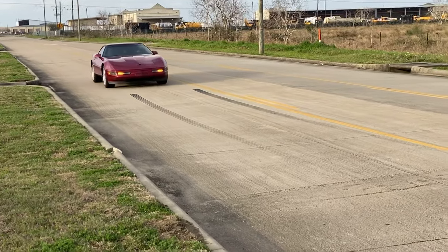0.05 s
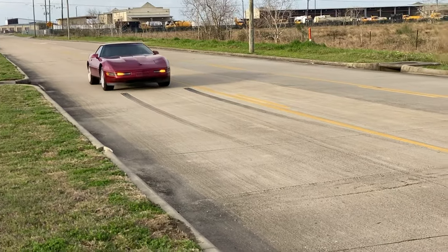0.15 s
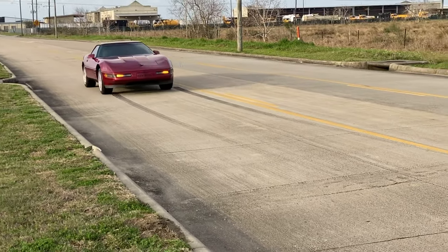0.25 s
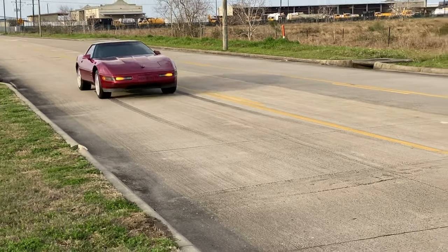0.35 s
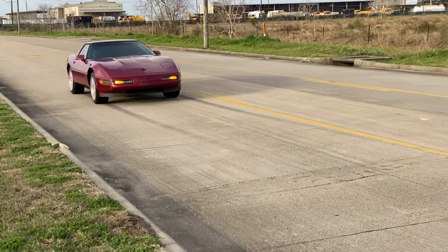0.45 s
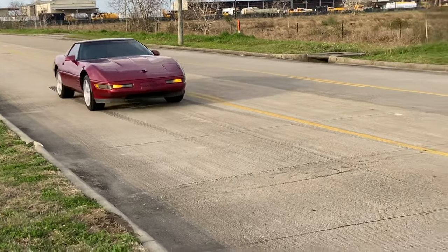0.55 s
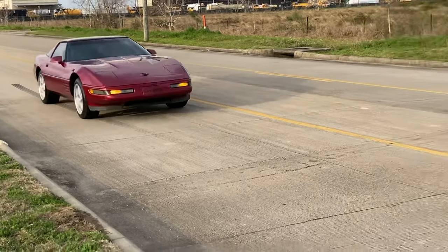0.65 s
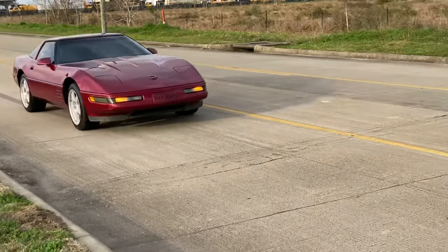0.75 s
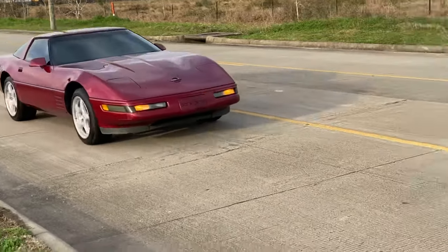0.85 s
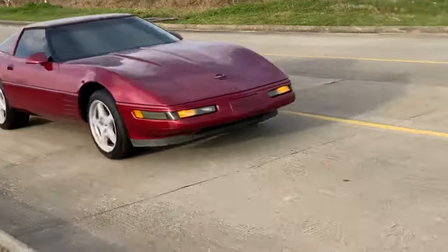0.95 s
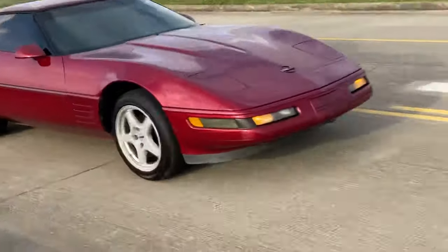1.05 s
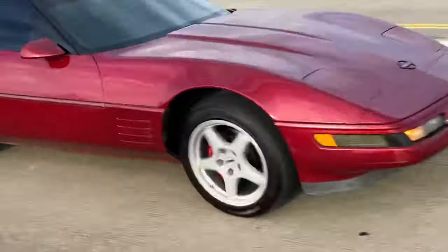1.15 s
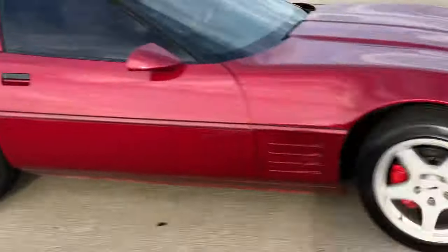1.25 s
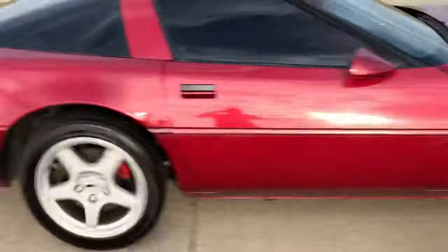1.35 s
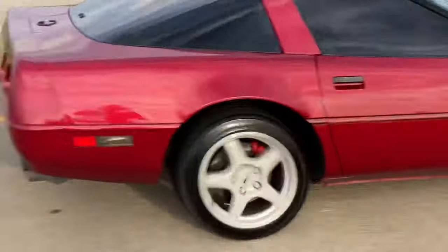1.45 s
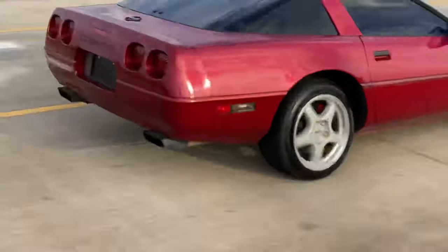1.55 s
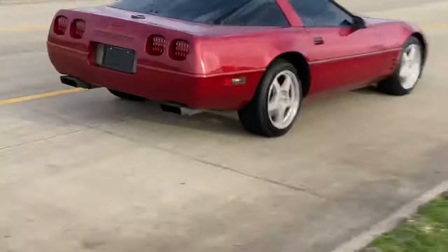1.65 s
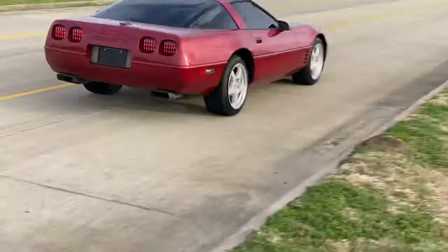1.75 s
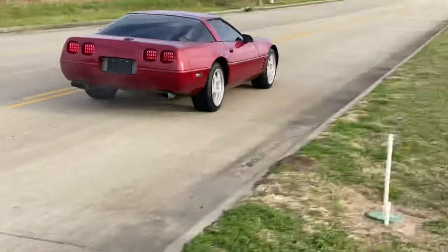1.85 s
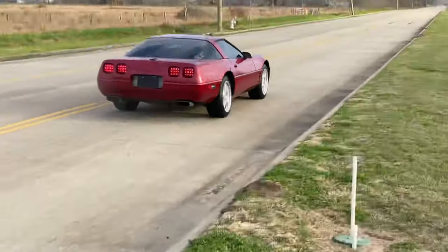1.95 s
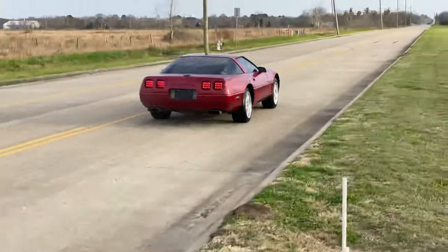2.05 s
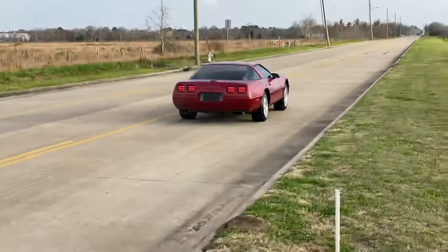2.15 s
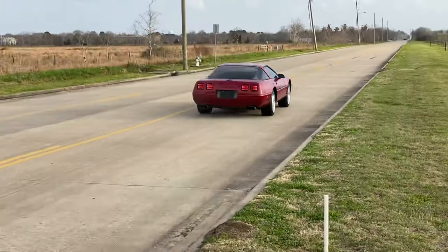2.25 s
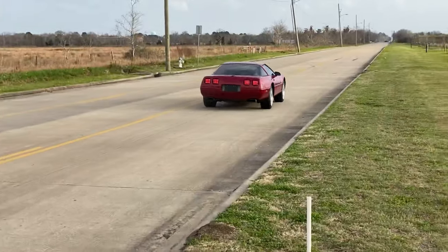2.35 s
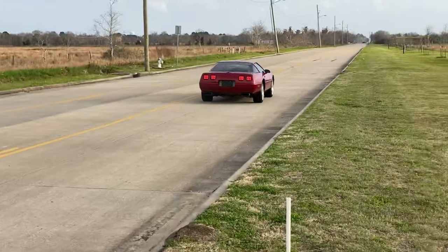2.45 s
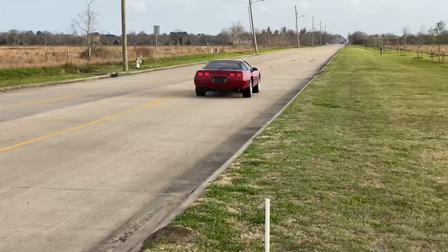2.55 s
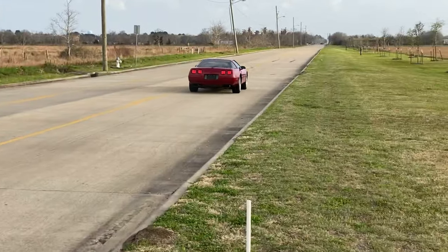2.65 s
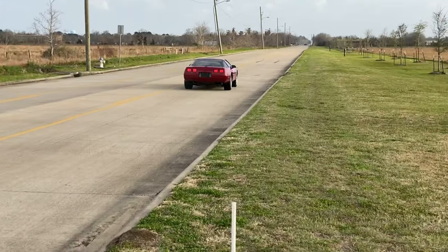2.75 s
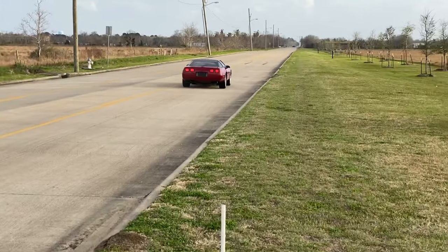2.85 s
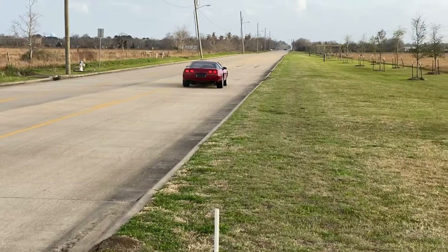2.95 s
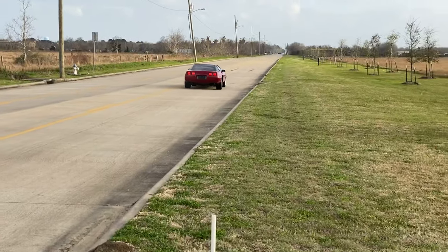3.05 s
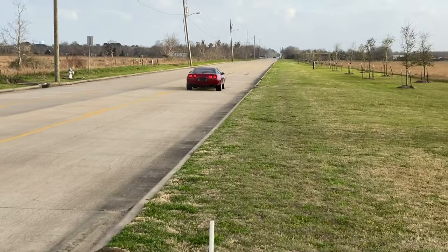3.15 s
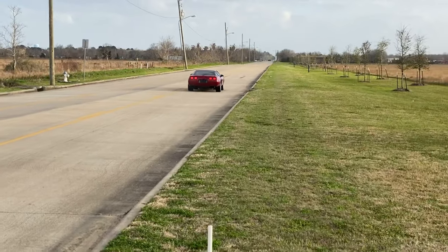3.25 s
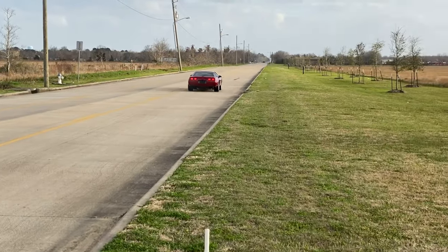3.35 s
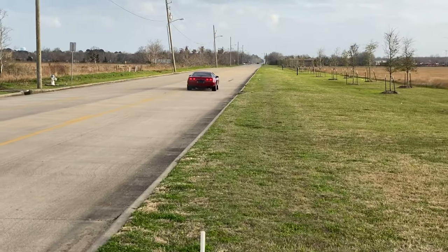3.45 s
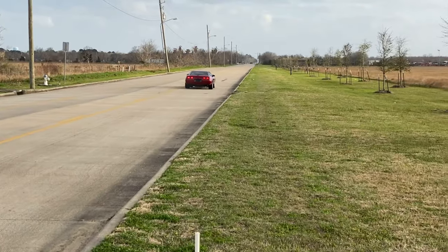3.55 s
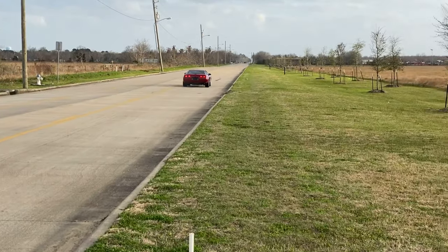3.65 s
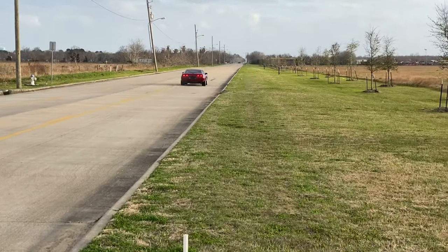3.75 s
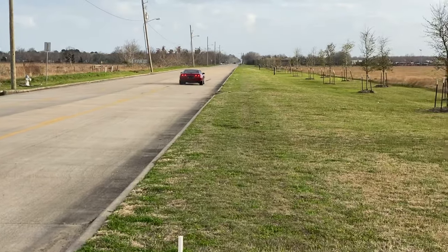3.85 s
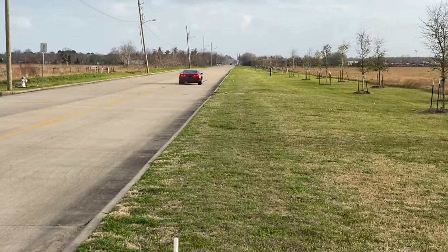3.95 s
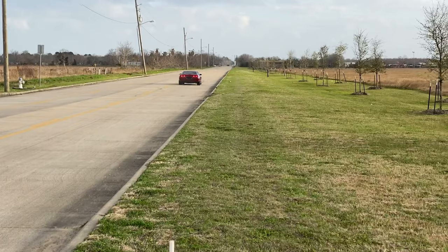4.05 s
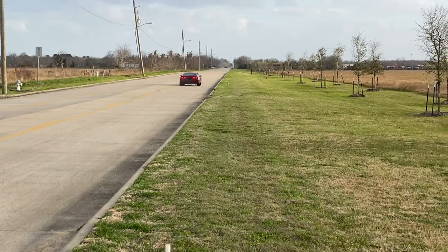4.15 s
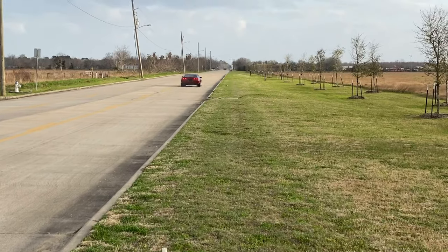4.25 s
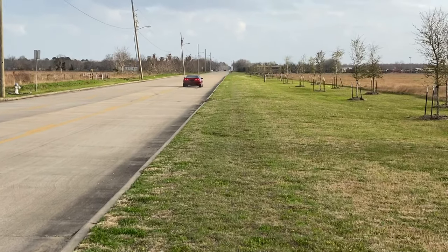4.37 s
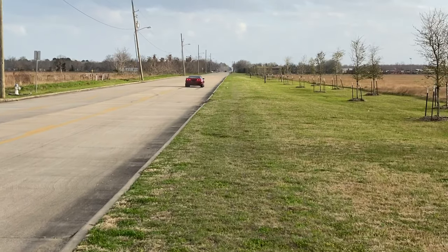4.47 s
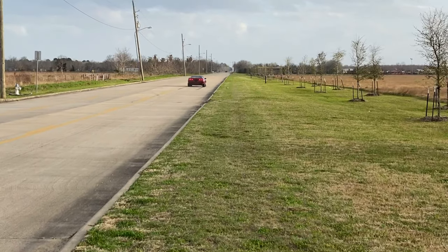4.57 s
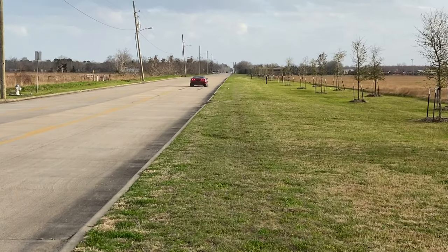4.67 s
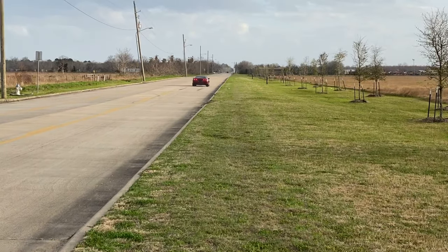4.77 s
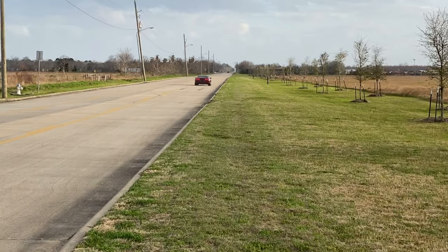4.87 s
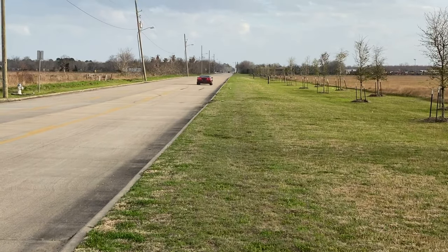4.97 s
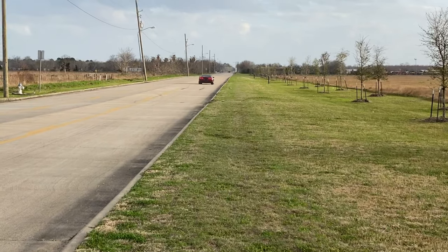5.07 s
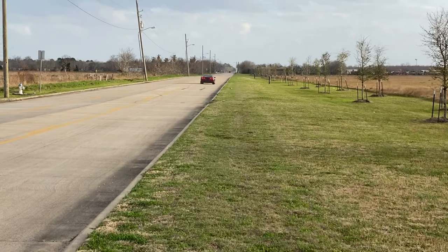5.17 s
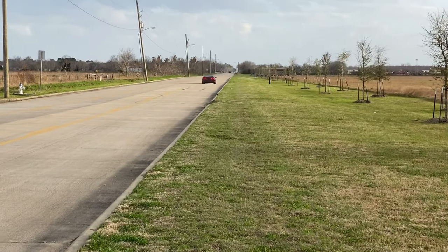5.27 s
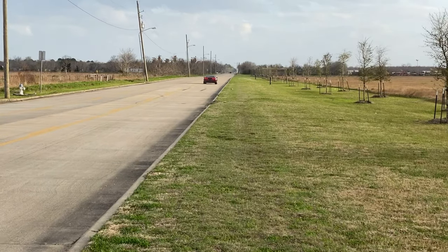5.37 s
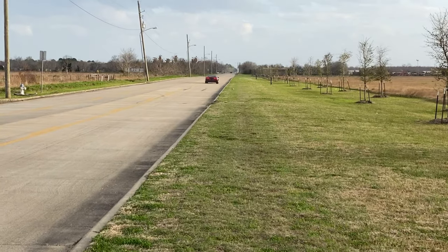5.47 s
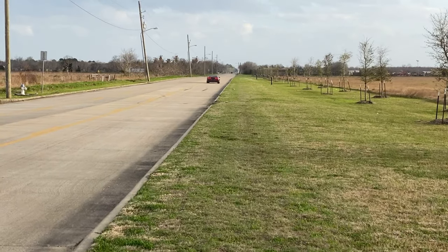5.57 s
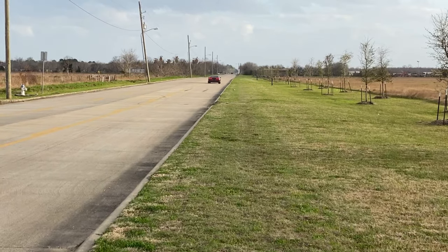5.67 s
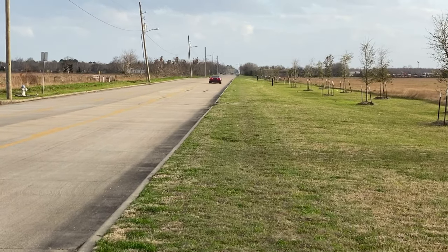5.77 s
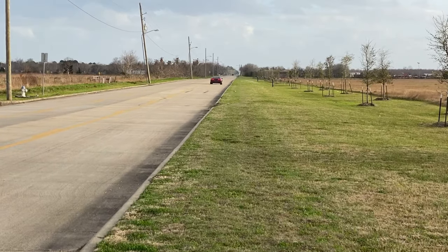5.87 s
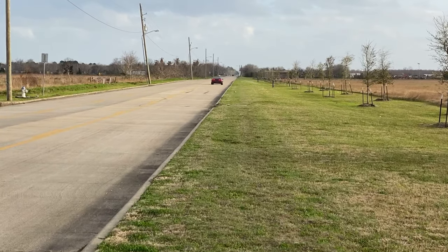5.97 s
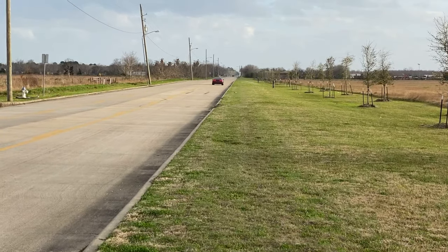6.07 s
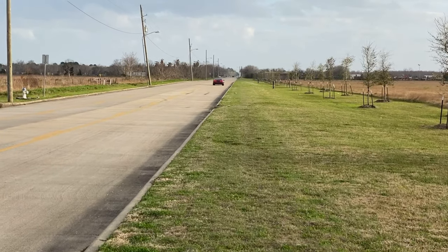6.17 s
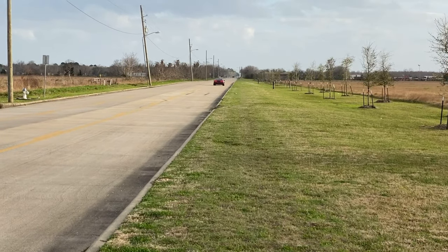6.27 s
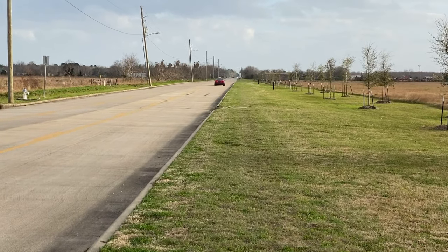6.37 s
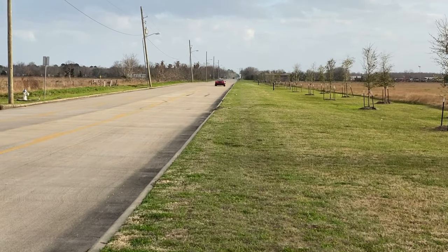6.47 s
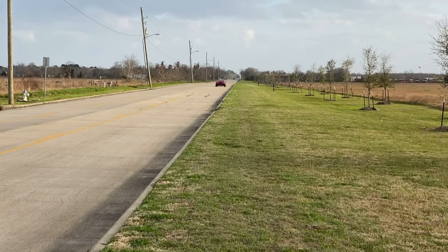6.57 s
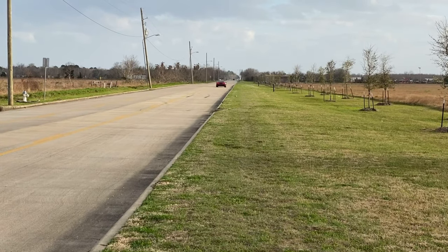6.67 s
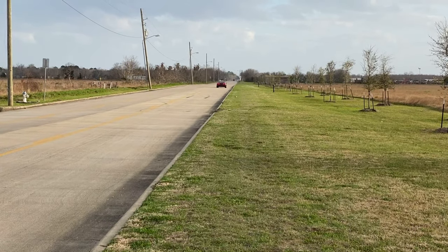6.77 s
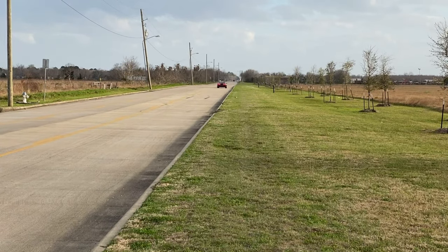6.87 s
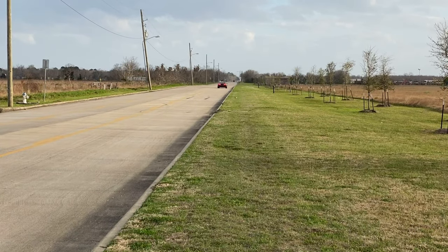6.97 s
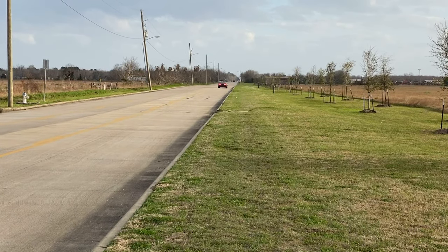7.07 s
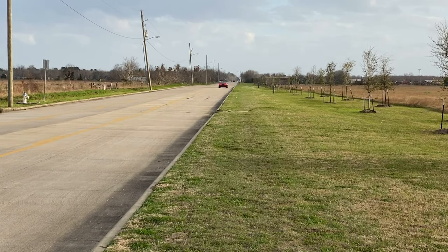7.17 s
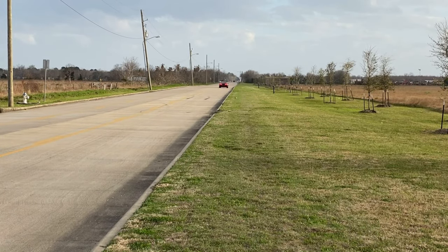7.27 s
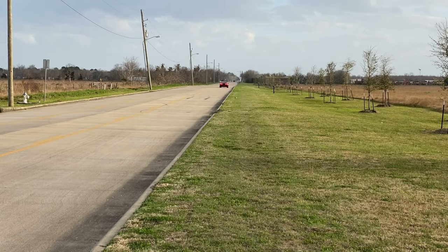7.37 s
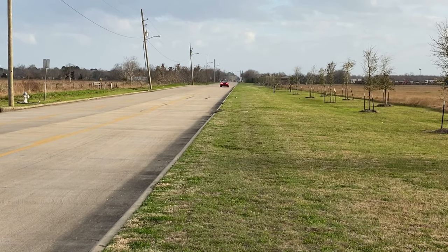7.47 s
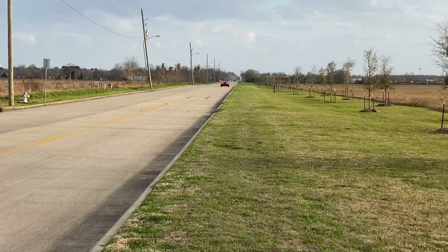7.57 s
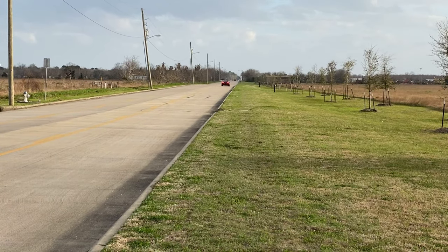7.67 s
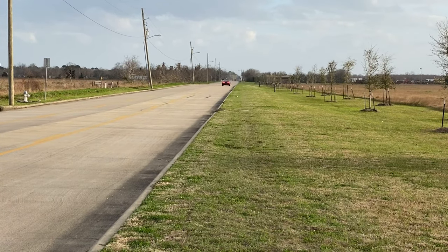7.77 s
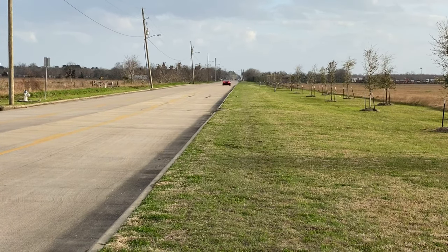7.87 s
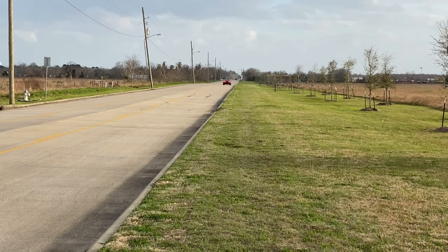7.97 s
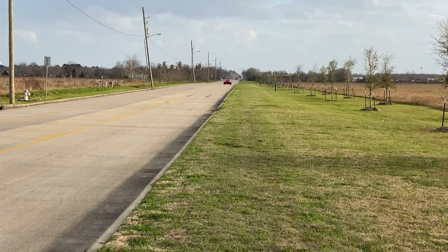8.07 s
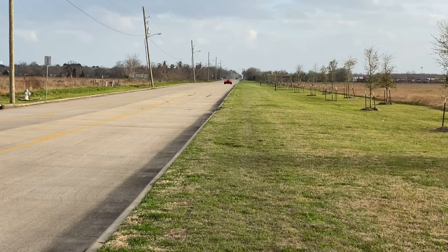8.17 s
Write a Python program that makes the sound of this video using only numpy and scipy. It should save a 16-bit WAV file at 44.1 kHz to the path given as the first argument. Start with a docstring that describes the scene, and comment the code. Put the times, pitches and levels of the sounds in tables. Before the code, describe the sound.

Close handheld roadside stereo microphone in an open field: an uneven, booming V8 climbs in pitch and sweeps past within about a second. Harsh bark and sizzle burst from the tailpipes, air buffets the microphone, and a quick blip follows. The car recedes under power, changes up with a crackle, then burbles lower with scattered sharp pops, dry and without obvious reverberation.

```python
"""A V8 car with open exhausts accelerates past a roadside listener, lifts off, blips and pulls away down an empty road.
Then it shifts up and coasts far off, burbling and popping on the overrun.
All along, eight uneven firings a cycle make the exhaust: a boom of low tones, and bark, rasp and sizzle above it.
Shaped noise makes the tyres, the open field and a light breeze from the start, then the car's wake as it passes.
Gas thumps follow the pass, and the pops are sharp cracks with low thuds."""
import sys
import numpy as np
from scipy import signal
from scipy.fft import rfft, irfft
from scipy.io import wavfile
from scipy.ndimage import uniform_filter1d, map_coordinates

SR = 44100
rng = np.random.default_rng(int(sys.argv[2]) if len(sys.argv) > 2 else 0)


def generate_wav(sig):
    """Save sig (samples, or channels by samples) to the path in sys.argv[1] as 16-bit PCM at SR."""
    pcm = np.round(np.clip(np.atleast_2d(sig).T, -1, 1) * 32767).astype(np.int16)
    wavfile.write(sys.argv[1], SR, pcm)


N = 362485
TIME = np.arange(N) / SR  # seconds
BINS = np.fft.rfftfreq(2 ** 19, 1 / SR)  # Hz


def gain_of(db):
    """Turns decibels into a gain."""
    return 10 ** (np.asarray(db) / 20)


def evened(x):
    """Scales a sound to rms 1."""
    return x / np.sqrt(np.mean(x ** 2) + 1e-20)


def steadied(x, size=4400):
    """Holds the running rms near 1 while keeping the single firings."""
    power = uniform_filter1d(uniform_filter1d(x ** 2, size), size // 2)
    return x / np.sqrt(abs(power) + 1e-20)


def curves(rows):
    """Draws the columns of a table as curves over time."""
    s, *columns = np.transpose(rows)
    return [np.interp(TIME, s, column) for column in columns]


def read(points):
    """Reads a table of values by pitch at every frequency bin."""
    hz, value = np.transpose(points)
    return np.interp(np.log(BINS + 1), np.log(hz + 1), value)


def filtered(x, response):
    """Makes each frequency louder, softer or shifted in phase."""
    size = 2 * (len(BINS) - 1)
    return irfft(rfft(x, size) * response)[..., :N]


def causal(points, order=4096):
    """The ring after a sharp blow, with this spectrum and energy 1."""
    spectrum = gain_of(read(points)[::(len(BINS) - 1) // order])
    cepstrum = irfft(np.log(spectrum))
    one_sided = np.r_[0, 2 * cepstrum[1:order]]  # puts the energy as early as it can be
    ring = irfft(np.exp(rfft(one_sided, 2 * order)))[:order]
    return ring / np.linalg.norm(ring)


def coloured(x, points):
    """Passes a sound through a spectrum table."""
    return signal.oaconvolve(x, causal(points))[:N]


def noise(points):
    """Steady noise of rms 1 with this spectrum."""
    return evened(coloured(rng.standard_normal(N), points))


def wander(hz):
    """A slow random curve of rms 1 that changes about hz times a second."""
    return evened(filtered(rng.standard_normal(N), np.exp(-(BINS / hz) ** 2)))


def above(hz, order=8):
    """The upper side of a crossover filter."""
    return 1 - 1 / (1 + (BINS / hz) ** order)


def bump(s, width_s):
    """A smooth swell of height 1 around a moment."""
    return np.exp(-((TIME - s) / width_s) ** 2)


def resonate(x, hz, width_hz):
    """A resonance of gain 1 that follows the curve hz."""
    turn = np.exp(2j * np.pi * np.cumsum(hz) / SR)
    r = np.exp(-np.pi * width_hz / SR)
    # shift the peak down to 0 Hz, smooth, and shift it back
    return 2 * (turn * signal.lfilter([1 - r], [1, -r], x / turn)).real


PASS_S = 1.262  # when the car is nearest


def nearness(nearest_m=2.52, car_m_per_s=7.87):
    """The car's closest distance over its present distance, on a straight path."""
    return nearest_m / np.hypot(nearest_m, car_m_per_s * (TIME - PASS_S))


def receding():
    """Loudness that holds until the car has passed, then falls with distance."""
    return np.where(TIME < PASS_S, 1, nearness())


# Strength of the eight firings: one level/dB for each cylinder.
UNDER_LOAD = [-11, -1.5, -11, -7, -12.5, -1, -12.5, -4.5]
BESIDE = [-7, -4, 1.5, -10.5, 1.5, 2, -11.5, 2.5]  # beside the listener
NEXT_GEAR = [-1.5, -6, 0, -2, -1, -13, 1.5, -6]
OVERRUN = [-8, 1.5, -3.5, 3, -15, -8, 4, -8]
FAR_OFF = [-12.5, -8, -2, 0.5, -9.5, -26, -3.5, 0.5]
# Low tones of the pipes: level/dB of 2, 3, 4, ... times the cycle rate.
LAUNCH_ORDERS = [-9, 3.5, 3, 2.5, -3.5, -6, 1, -2, -2, -2, 0, 2, -0.5, -13]
NEARING_ORDERS = [-15.5, 1, -4, -8.5, -6, -7, -2.5, 0, -5.5, -14, -10, -10]
PASSING_ORDERS = [-27, 2, -13, -4, 0, -10, 0.5, -0.5, -7.5, -8, -24]
SURGE_ORDERS = [-11, 0, -18, -2, -11, -8, 1, -4, -5, -23]
EASING_ORDERS = [-10, -0.5, -16, 3, -21, -1.5, 0, -1, -7, -2]
BLIP_ORDERS = [-20, -6.5, -7, -3.5, -10, -6, -1, 2.5, -8, -5, -11, -22, -11.5, -22]
SETTLING_ORDERS = [-28, -10, -5, -7, -7, -5.5, 1.5, 0, -4, -9, -9, 3.5, -2.5, -18, -11, -6.5, -17, -9, -10,
                   -6.5]
LEAVING_ORDERS = [-23, -18, -7, -20, -6.5, -9, 2, -11, -2, -10, -1, -4, 2, -26, -10, -11, -8, -15, -25, -11,
                  -10.5, -16, -20, -11, -24, -17, -15, -9, -24, -10]
PULLING_ORDERS = [-27, -19, 0, -8.5, -6.5, -8.5, 0.5, -6, 0.5, 1, 0, -10.5, -6.5, -17, -8, -3.5, -13.5, -17,
                  -15, -13, -14.5, -18, -12.5, -18, -19, -28]
SHIFTING_ORDERS = [-17, -34, -15, -10.5, -6, -5, 3, -23, -9.5, -3.5, -24, -8, -5, -8, -3, -10, -17, -12,
                   -14, -12, -19, -8, -12, -22, -28, -25, -18]
COASTING_ORDERS = [-20, -11, -15.5, -6.5, -1, -4, 2, 1, -8, -1, -4, 0, 2, 0, 4.5, -8, -18.5, -14, -16, -6.5,
                   -12, -7]
FAR_ORDERS = [-20, -11.5, -10.5, -14, -2, -12, 1.5, -27, -16, -19, -11.5, -19, -17, -5.5, -2, -13, -9.5,
              -18, -12.5, -22, -19, -11.5, -8.5]
# Colour of the exhaust above the boom: f/Hz, level/dB.
LAUNCH_COLOUR = [(290, -46), (500, 3.5), (658, -14.5), (988, -9), (1250, -19.5), (1640, -15.5),
                 (2680, -17.5), (7290, -22), (11900, -42), (14400, -35), (16000, -43)]
NEARING_COLOUR = [(290, -18), (500, 1), (708, -2.5), (1080, -6), (1400, -23.5), (1560, -19), (1680, -7.5),
                  (1800, -15), (1980, -20.5), (2300, -17), (3590, -23.5), (6880, -18), (10500, -30.5),
                  (14400, -31), (16000, -24)]
PASSING_COLOUR = [(290, -41), (500, 3), (974, -11), (1340, -5.5), (1560, -13), (1800, -1.5), (2350, -7.5),
                  (3050, -1), (3800, -7), (4500, -8.5), (5400, -12.5), (6600, -9), (12100, -23.5),
                  (14400, -15.5), (16000, -28)]
LEAVING_COLOUR = [(290, -39), (500, -17), (560, -10.5), (1060, -19), (1300, -18), (1570, -28.5),
                  (1740, -24), (3100, -23.5), (7510, -28.5), (8680, -36), (14200, -39), (16000, -36)]
PULLING_COLOUR = [(290, -41), (500, -9.5), (960, -11), (1300, -13.5), (1650, -17), (2030, -15),
                  (2450, -17.5), (3100, -14.5), (6500, -24.5), (9890, -35.5), (16000, -45)]
SHIFTING_COLOUR = [(290, -36), (500, 9.5), (700, -1), (1050, -5.5), (1300, -10), (1650, -9), (2200, -6.5),
                   (2550, -11.5), (2950, -7.5), (4000, -18.5), (6500, -25), (9890, -41.5), (16000, -51)]
COASTING_COLOUR = [(350, -30), (520, 9.5), (680, 10), (1000, -0.5), (1250, -3), (1600, -8), (1850, -4),
                   (2200, -1.5), (2500, -9.5), (3000, -1.5), (4000, -10), (5500, -13.5), (8000, -25.5),
                   (16000, -66)]
FAR_COLOUR = [(350, -5), (560, 2), (680, 14), (830, 3), (980, 2), (1120, 1), (1250, -8), (1380, -11.5),
              (1600, -16.5), (2200, -17), (3000, -16), (4500, -18.5), (7000, -30), (16000, -58)]
# Phases of the drive: start t/s, end t/s, orders, colour, firing strengths,
# sweep of each firing/turns (falling if positive), boom level/dB, bark level/dB, sizzle level/dB
# (all close by, at effort 0), roughness/0-1, unevenness/factor on the cylinder dB, smear of the puffs/0-1.
PHASES = [ (0, 0.24, LAUNCH_ORDERS, LAUNCH_COLOUR, UNDER_LOAD, -1.2, -13.5, -22, -38, 0.29, 0.5, 0.33),
          (0.586, 1.202, NEARING_ORDERS, NEARING_COLOUR, BESIDE, -1.17, -11, -22.5, -33, 0.16, 0.15, 0.32),
          (1.25, 1.319, SURGE_ORDERS, NEARING_COLOUR, BESIDE, -.5, -11.5, -28.5, -25.5, 0.1, 0.28, 0.32),
          (1.356, 1.562, PASSING_ORDERS, PASSING_COLOUR, BESIDE, 0.62, -12, -19.5, -21.5, 0.07, 0.67, .02),
          (1.647, 1.68, EASING_ORDERS, PASSING_COLOUR, BESIDE, 0.62, -13, -22, -23.5, 0.12, 0.94, .02),
          (1.73, 1.872, BLIP_ORDERS, PASSING_COLOUR, UNDER_LOAD, 1.1, -10.5, -21.5, -22, 0.15, 0.72, .02),
          (1.965, 2.19, SETTLING_ORDERS, LEAVING_COLOUR, UNDER_LOAD, 1.6, -11, -22, -27.5, 0.11, 0.83, 0.045),
          (2.287, 2.717, LEAVING_ORDERS, LEAVING_COLOUR, UNDER_LOAD, 1.6, -11, -19, -27.5, 0.13, 0.99, 0.053),
          (3.056, 4.29, PULLING_ORDERS, PULLING_COLOUR, UNDER_LOAD, 1.573, -10.5, -22.5, -28, 0.18, 0.73, .16),
          (4.488, 4.926, SHIFTING_ORDERS, SHIFTING_COLOUR, NEXT_GEAR, 1.22, -12.5, -18, -30, 0.09, 0.98, .06),
          (5.003, 6.543, COASTING_ORDERS, COASTING_COLOUR, OVERRUN, .8, -14, -20.5, -33, 0.23, 0.81, 0.12),
          (6.81, 8.22, FAR_ORDERS, FAR_COLOUR, FAR_OFF, .4, -11, -17.5, -36, 0.085, 0.9, 0.42)]


def phase_shares():
    """How much each phase counts at each moment, fading from one to the next."""
    edges = [s for row in PHASES for s in row[:2]]
    return [np.interp(TIME, edges, np.repeat(one, 2)) for one in np.eye(len(PHASES))]


# How hard the exhaust is driven: t/s, effort level/dB.
EFFORT = [(0, 1), (.23, 3.5), (.35, -3), (0.799, 0.5), (1.15, -6), (1.65, -2.5), (1.85, 1), (2.05, -0.5),
          (2.65, -4.5), (4.38, -4), (4.445, 0.5), (4.485, -4), (4.51, 7.5), (4.92, 4.5), (5.0, -4),
          (5.08, -15), (5.3, -5), (5.85, -9.5), (5.96, 1.5), (6.58, 1), (6.721, -3), (8.22, 5)]
# Change for each dB of effort, in order boom, bark, rasp, sizzle: level/dB per dB.
FOLLOWS_EFFORT = (.15, .5, 1.01, 1.1)
# Gear changes, each a cut in power, a ragged surge and a second cut:
# surge t/s, surge level/dB, cut level/dB, added roughness/0-1.
GEAR_CHANGES = [(1.278, 2, -5.5, 0.2), (4.42, 0, -6, 0.39)]


def drive(rasp_db=-22, cut_offset_s=0.053, cut_width_s=0.0084, surge_width_s=0.041, rough_width_s=0.082):
    """Band levels and firing manner, set by phase, effort, distance and gear changes."""
    edges = [(s, *row[6:]) for row in PHASES for s in row[:2]]
    boom_db, bark_db, sizzle_db, rough, uneven, smear = curves(edges)
    shared_db = 20 * np.log10(receding())
    for s, surge_db, cut_db, change_rough in GEAR_CHANGES:
        cuts = bump(s - cut_offset_s, cut_width_s) + bump(s + cut_offset_s, cut_width_s)
        shared_db = shared_db + surge_db * bump(s, surge_width_s) + cut_db * cuts
        rough = rough + change_rough * bump(s, rough_width_s)
    effort_db = curves(EFFORT)[0]
    bands_db = (boom_db, bark_db, rasp_db, sizzle_db)
    levels = [db + follows * effort_db + shared_db for db, follows in zip(bands_db, FOLLOWS_EFFORT)]
    return levels, np.clip(rough, 0, 1), uneven, np.clip(smear, 0, 1)


# When each of the eight cylinders fires: place in the engine cycle/0-1.
CYLINDERS = [.07, .19, .31, .43, .56, .705, .815, .93]


def firings(cycles, rough, uneven, scatter_db=10.5, puff_s=0.0013, path_s=0.0014, echo=0.22):
    """Each cylinder sends a shock down its own path and blows a short puff of gas."""
    t = np.arange(SR // 50) / SR
    shocks, puffs = np.zeros(N), np.zeros(N)
    strengths = np.transpose([row[4] for row in PHASES]) @ np.array(phase_shares())
    for place, db in zip(CYLINDERS, strengths):
        at = np.flatnonzero(np.diff(np.floor(cycles - place)) > 0)
        chance = rng.standard_normal(SR // 100)[:len(at)]
        train = np.zeros(N)
        train[at] = gain_of(db[at] * uneven[at] + scatter_db * rough[at] * chance)
        path = echo * rng.standard_normal(len(t)) * np.exp(-t / path_s) + (t == 0)
        shocks += signal.oaconvolve(train, path)[:N]
        puffs += train
    puff = np.exp(-t / puff_s) * (1 - np.exp(-4 * t / puff_s))
    return steadied(shocks), steadied(signal.oaconvolve(puffs, puff)[:N])


# Spectrum of the ragged burble: f/Hz, level/dB.
BURBLE = [(25, -31), (60, -11), (110, -4), (200, -9), (400, -0.5), (550, -3), (800, -16), (2000, -102)]


def boom(cycles, rough, puffs, waver_db=.5, shimmer=0.19):
    """The low orders of the pipes, with a noisy burble where the firings are ragged."""
    turn, tone = np.linspace(0, 1, SR // 20), np.zeros(N)
    multiples = np.arange(1, 2 ** 5)
    stray_lags = rng.random(len(multiples))
    drift = shimmer * wander(6.5)  # no two cycles burn quite alike
    for share, (_, _, orders, _, strengths, sweep, *_) in zip(phase_shares(), PHASES):
        beat = np.exp(-2j * np.pi * np.outer(multiples, CYLINDERS)) @ gain_of(strengths)
        # the pipes draw each firing out into a sweep
        lags = sweep * np.log(multiples) - np.angle(beat) / (2 * np.pi)
        for lag, weight in ((lags, 1), (stray_lags, drift)):
            cycle = sum(gain_of(db) * np.cos(2 * np.pi * (k * turn - lag[k - 1]))
                        for k, db in zip(multiples[1:], orders))
            tone += share * weight * np.interp(cycles % 1, turn, evened(cycle))
    burble = coloured((puffs + 1.5) * rng.standard_normal(N), BURBLE)
    mixed = (1 - rough) * steadied(tone) + rough * steadied(burble)
    return steadied(mixed) * gain_of(waver_db * wander(16))


def over_road(x, flutter_db=1.88, road_echo=.75, road_lag_s=.00087, road_dull_hz=2000,
              air_echo=.55, air_lags_s=(.0009, .0021), air_drift_s=.00016):
    """Adds a dull echo off the concrete nearby, drifting paths through air far off, and a level flutter."""
    dull = filtered(x, 1 - above(road_dull_hz, order=2))
    bounced = np.interp(TIME - road_lag_s * nearness(), TIME, dull)  # longest lag at the nearest point
    heard = x + road_echo * bump(1.6, .45) * bounced  # strongest while the tailpipes are close
    for lag_s in air_lags_s:
        moving_time = TIME - lag_s - air_drift_s * wander(1.4)
        heard += air_echo * (1 - receding()) ** 8 * np.interp(moving_time, TIME, x)
    return heard, gain_of(flutter_db * wander(15.0))


# Engine speed as heard: t/s, four-stroke cycle rate f/Hz.
SPEED = [(0.0, 35.25), (0.18, 36.57), (0.46, 41.05), (0.82, 45.95), (1.14, 49.78), (1.24, 50.02),
         (1.33, 49.25), (1.5, 43.3), (1.61, 39.5), (1.73, 40.32), (1.83, 45.78), (1.93, 41.13), (2.1, 37.0),
         (2.27, 32.95), (2.4, 34.4), (3.06, 37.7), (3.57, 40.18), (4.08, 42.27), (4.35, 43.63),
         (4.5, 43.18), (4.63, 40.45), (4.95, 34.65), (5.24, 29.18), (5.35, 29.98), (5.6, 29.75),
         (6.15, 29.2), (6.5, 28.78), (7.2, 28.07), (8.22, 26.9)]
# A peak added to the exhaust that drifts and swells as the car recedes: t/s, f/Hz, level/dB.
RASP_PEAK = [(2.1, 1740, -8), (2.6, 3200, -19.5), (3.4, 2030, -7), (4.3, 2050, 5.5), (4.53, 2330, -3),
             (4.85, 3000, -6), (5.1, 2200, 1), (6, 2880, -10), (6.4, 2150, -2), (7.45, 2530, -17),
             (7.6, 2360, 4), (7.75, 2200, 5), (7.83, 2600, -8), (7.95, 2920, -5), (8.03, 1800, 2),
             (8.2, 1990, 7)]


def exhaust(pipe_echo=0.06, pipe_s=0.0062, bark_noise=0.14, rasp_noise=0.34, sizzle_noise=0.58,
            speed_waver=.0007, peak_width_hz=510):
    """Boom, then three noisier bands of the firing shocks: bark, rasp and sizzle."""
    cycles = np.cumsum(curves(SPEED)[0] * (1 + speed_waver * wander(20))) / SR
    (boom_db, bark_db, rasp_db, sizzle_db), rough, uneven, smear = drive()
    shocks, puffs = firings(cycles, rough, uneven)
    gas = steadied(((1 - smear) * puffs + smear) * rng.standard_normal(N))
    shares = phase_shares()
    clean, ragged = (sum(share * coloured(x, row[3]) for share, row in zip(shares, PHASES))
                     for x in (shocks, gas))
    out = gain_of(boom_db) * boom(cycles, rough, puffs)
    low, middle, high = above(490), above(1267), above(3590)
    t = np.arange(SR // 30) / SR
    # the bark rings on in the pipes
    ring = pipe_echo * rng.standard_normal(len(t)) * np.exp(-t / pipe_s) + (t == 0)
    rung = signal.oaconvolve(clean, ring / np.linalg.norm(ring))[:N]
    bands = ((low - middle, bark_db, rung, bark_noise + 0.87 * rough),
             (middle - high, rasp_db, clean, rasp_noise + 0.95 * rough),
             (high, sizzle_db, clean, sizzle_noise))
    for band, db, tone, turbulence in bands:
        turbulence = np.clip(turbulence, 0, 1)
        heard, flutter = over_road((1 - turbulence) * tone + turbulence * ragged)
        out += gain_of(db) * flutter * steadied(filtered(heard, band))
    peak_hz, peak_db = curves(RASP_PEAK)
    return out + gain_of(peak_db) * resonate(out, peak_hz, peak_width_hz)


# Spectrum of tyres on concrete: f/Hz, level/dB.
TYRES = [(60, -11), (300, 4), (1000, 4), (2500, -1), (6000, -5.5), (10000, -10.5), (16000, -21)]


def tyres(roll_db=-33, roll_fall=1.6, swish_db=-21, swish_s=1.168, swish_width_s=0.074):
    """Noise for a roll that fades with distance to the power roll_fall, and a swish as the wheels go by."""
    roll = gain_of(roll_db) * receding() ** roll_fall
    swish = gain_of(swish_db) * bump(swish_s, swish_width_s)
    return (roll + swish) * noise(TYRES)


# Spectrum of the open field: f/Hz, level/dB.
FIELD = [(20, -18), (70, -15), (200, -18), (900, 7), (3000, -15), (8000, -57), (16000, -65)]


def field(level_db=-50):
    """The open field is a faint, steady noise."""
    return gain_of(level_db) * noise(FIELD)


# Spectrum of air buffeting the microphone: f/Hz, level/dB.
WIND = [(15, -3), (30, -20), (52, 0), (100, -1.5), (200, -3), (400, -21), (1500, -83)]
# Breeze on the microphone before gusts: t/s, level/dB.
BREEZE_DB = [(0, -52), (6.2, -52.5), (6.9, -42.5), (7.65, -45), (8.22, -35)]


def wind(gust_db=3, apart=0.35, wake_db=-27.5, wake_s=1.865, rise_db_per_s=6.5, fall_db_per_s=172):
    """Lumpy low buffets, mostly shared by both ports: a breeze, and a wake that builds and collapses."""
    wake = wake_db - np.maximum(rise_db_per_s * (wake_s - TIME), fall_db_per_s * (TIME - wake_s))
    stronger = np.maximum(wake, curves(BREEZE_DB)[0])
    level = gain_of(stronger + gust_db * wander(22))
    return level * (noise(WIND) + apart * np.array([noise(WIND), noise(WIND)]))


# Spectrum of a gas thump: f/Hz, level/dB.
THUMP = [(20, -44), (45, 8), (70, 5), (130, 4), (250, -4), (600, -41), (2000, -80)]
# Gas from the tailpipes hitting the microphone: t/s, peak level/dB.
THUMPS = [(1.487, -16), (1.551, -21), (1.614, -12), (1.725, -7), (1.84, -17)]


def thumps():
    """Slugs of exhaust gas strike the microphone as deep thumps that die away."""
    train, ring = np.zeros(N), causal(THUMP)
    for s, db in THUMPS:
        train[round(s * SR)] = gain_of(db)
    return signal.oaconvolve(train, ring / abs(ring).max())[:N]


# Unburnt fuel going off in the pipes, singly or in runs of one pop per engine cycle:
# t/s, pops in the run/count, thud peak level/dB, crack peak level/dB (both of the first pop), crack pitch/factor.
POPS = [(1.684, 1, -31.5, -8, 2.2), (1.723, 1, -4.5, -24, 1.9), (2.7149, 4, -38, -19.5, 1.43),
        (2.88, 1, -46, -23, 1.3), (2.907, 2, -39, -16, 1.5), (2.961, 4, -33, -12.5, 1.31),
        (4.207, 1, -28, -18, 0.87), (4.3445, 1, -26, -26, .95), (4.406, 1, -32, -23, 0.94),
        (4.4295, 2, -24, -21, 0.99), (4.439, 1, -30, -28, 0.82), (4.443, 1, -28, -21, 1.05),
        (4.499, 1, -25, -26, 0.86), (4.522, 2, -34, -20, 0.92), (5.142, 1, -36, -31, 1.04),
        (5.266, 2, -55, -32, 1.14), (5.423, 2, -28, -27.5, 1.3), (5.898, 1, -18, -27, 1),
        (5.915, 1, -20, -38, 1), (5.94, 1, -21, -38, 1.2), (5.987, 2, -27, -27, 1.17),
        (6.122, 2, -28, -26, 0.89), (6.175, 1, -19, -8.5, 1.12), (6.187, 1, -18.5, -25, 0.93),
        (6.193, 1, -21, -25, 1), (6.283, 1, -24, -28, 1.3), (6.296, 1, -26.5, -24, 0.92),
        (6.311, 2, -26, -26, 0.94), (6.3685, 5, -28, -30, 1), (6.382, 4, -21, -16.5, 0.94),
        (6.543, 2, -33, -21, 0.97), (6.6125, 1, -30, -25, 0.84)]


def single_pops(fade_db=-1):
    """Spells out the runs: the same cylinder pops again each cycle, a little weaker."""
    for s, count, thud_db, crack_db, pitch in POPS:
        cycle_s = 1 / np.interp(s, *np.transpose(SPEED))
        for k in range(round(count)):
            yield s + k * cycle_s, thud_db + k * fade_db, crack_db + k * fade_db, pitch


# Spectra of a pop's low thud and sharp crack (before its pitch factor): f/Hz, level/dB.
THUD = [(25, -45), (70, -6.5), (150, -1.5), (330, 1), (600, -10.5), (1500, -34), (5000, -84)]
CRACK = [(200, -48), (700, 3.5), (1500, -11.5), (1820, 3), (2200, 9.5), (2550, 5), (3000, -0.5),
         (3700, -5.5), (5500, -10.5), (8000, -24.5), (15000, -45)]


def pops(crack_s=0.0024, thud_s=0.0065, thud_ring=0.063, crack_noise=0.12):
    """Fuel going off makes a sharp crack and a low thud of the pipe."""
    t, out = np.arange(SR // 15) / SR, np.zeros(N)
    thud_colour, crack_colour = causal(THUD), causal(CRACK)
    for s, thud_db, crack_db, pitch in single_pops():
        a, b = rng.standard_normal((2, len(t)))
        thud = signal.fftconvolve((t == 0) + thud_ring * a * np.exp(-t / thud_s), thud_colour)
        crack = signal.fftconvolve((t == 0) + crack_noise * b * np.exp(-t / crack_s), crack_colour)
        crack = map_coordinates(crack, [pitch * np.arange(len(crack))])  # played faster or slower
        pop = gain_of(thud_db) * thud / abs(thud).max() + gain_of(crack_db) * crack / abs(crack).max()
        part = out[round(s * SR):][:len(pop)]
        part += pop[:len(part)]
    return out


# Phase between the two microphone ports: f/Hz, left lead/radians.
TREBLE_PHASE = [(7100, 0), (8500, -3.14), (9800, -6.2), (10500, -6.3), (12200, -9.42), (13600, -12.5),
                (14300, -12.7), (16000, -16)]  # shared upper end of the next two
NEAR_PHASE = [(50, .1), (500, .36), (780, .18), (1200, .55), (1500, .5), (1850, -.45), (2200, 0),
              (3100, .15), (4200, .05)] + TREBLE_PHASE
FAR_PHASE = [(100, 0), (500, .2), (780, 0), (1150, .05), (1750, -.65), (2150, 0), (3000, .6),
             (3900, .2)] + TREBLE_PHASE
# Balance of the ports, car near and far: f/Hz, left minus right level/dB.
NEAR_BALANCE = [(550, .3), (700, 3), (1000, 3), (1320, 9), (1650, -1), (2200, 0)]
FAR_BALANCE = [(550, 0), (700, 2), (870, 1.3), (1150, 4), (1500, 4.5), (1780, -4), (2100, 0)]
# How alike the sound is at the two ports: f/Hz, likeness/0-1.
PORT_LIKENESS = [(100, .98), (600, .98), (1000, .95), (1450, .7), (2100, .995), (6500, .99), (9000, .96),
                 (16000, .95)]


def ports(x, switch_s=1.6):
    """One sound at two microphone ports, which part in phase in the treble; near turns to far at once."""
    likeness = np.clip(read(PORT_LIKENESS), 0, 1)
    t = np.arange(SR // 5) / SR
    # road, kerb and grass scatter a faint tail that differs between the ports
    scatter = rng.standard_normal(len(t)) * np.sqrt(t) * np.exp(-t / .03)
    tail = signal.oaconvolve(x, scatter / np.linalg.norm(scatter))[:N]
    stray = filtered(tail, np.sqrt((1 - likeness) / 2))
    direct = filtered(x, np.sqrt((1 + likeness) / 2))
    near, out = np.where(TIME <= switch_s, 1.0, 0.0), 0
    for share, balance, phase in ((near, NEAR_BALANCE, NEAR_PHASE), (1 - near, FAR_BALANCE, FAR_PHASE)):
        tilt = gain_of(read(balance) / 2) * np.exp(.5j * read(phase))
        left, right = filtered(direct + stray, tilt), filtered(direct - stray, 1 / tilt)
        out = out + share * np.array([left, right])
    return out


def scene():
    """The car, its tyres and pops and the open field at both ports, with wind and thumps on top."""
    return ports(exhaust() + tyres() + field() + pops()) + wind() + thumps()


def record(dry, ceiling=1.0, edge_hz=15850):
    """Rounds off the loudest peaks, then cuts the treble above edge_hz."""
    rounded = dry / (1 + (dry / ceiling) ** 8) ** (1 / 8)
    low_pass = signal.firwin(511, edge_hz, window=("kaiser", 9), fs=SR)
    return signal.oaconvolve(rounded, low_pass[None], "same")


dry = scene()
out = record(dry)
generate_wav(out)
```